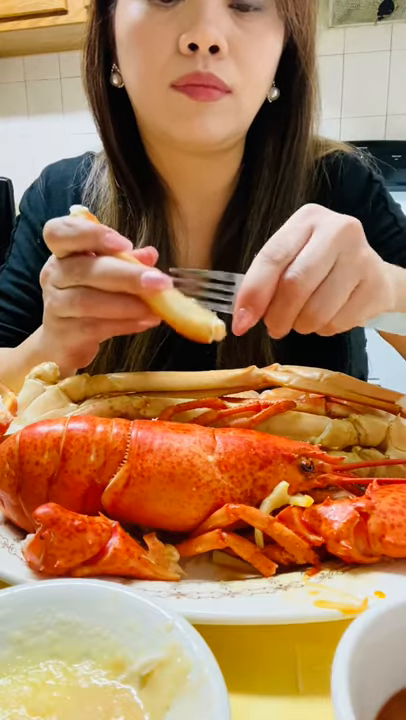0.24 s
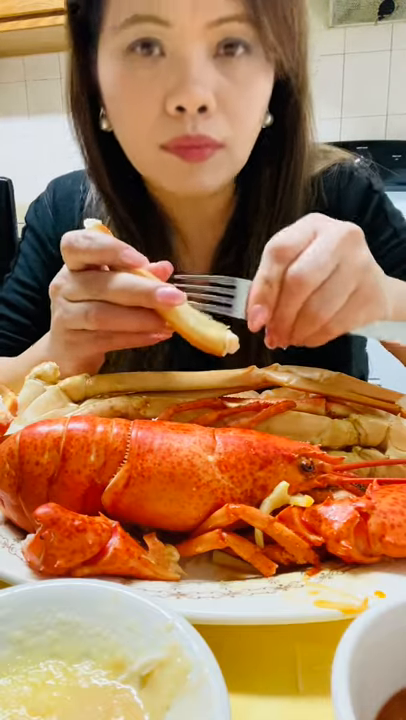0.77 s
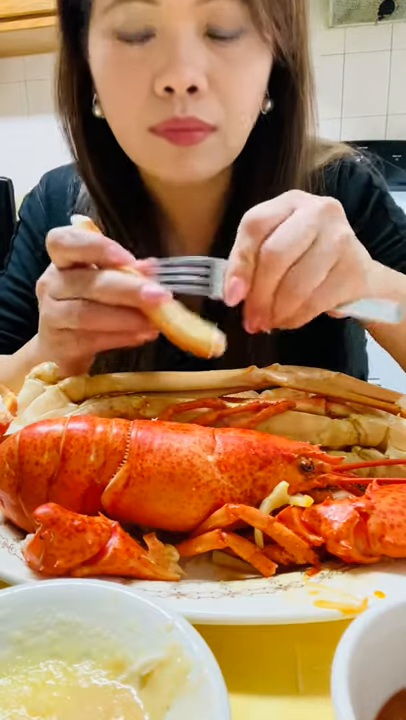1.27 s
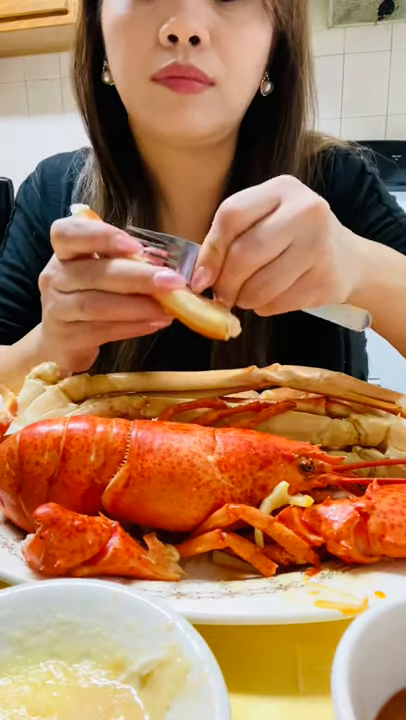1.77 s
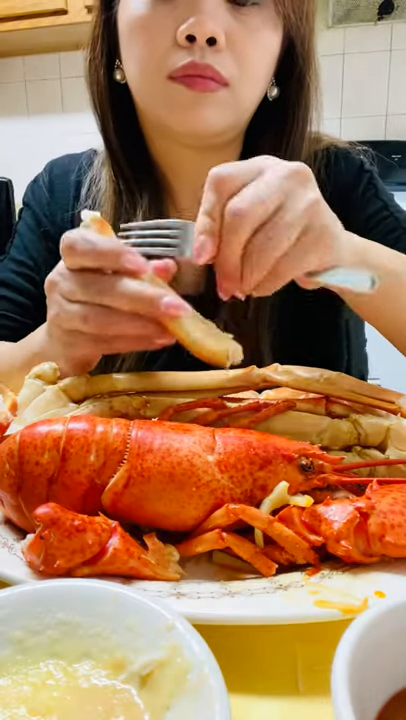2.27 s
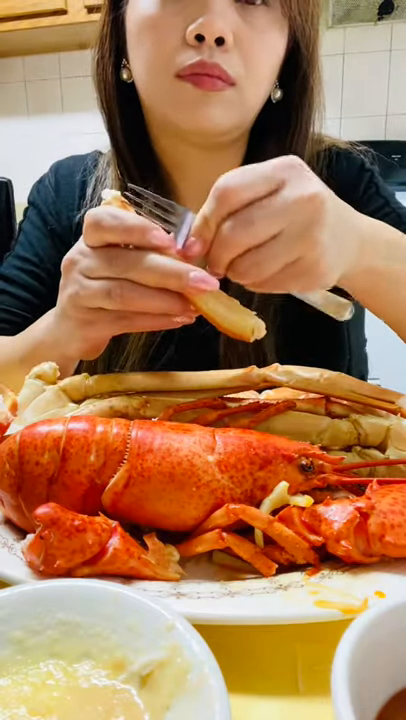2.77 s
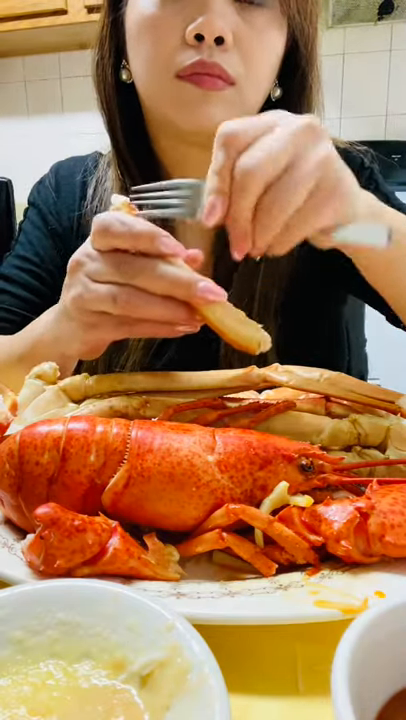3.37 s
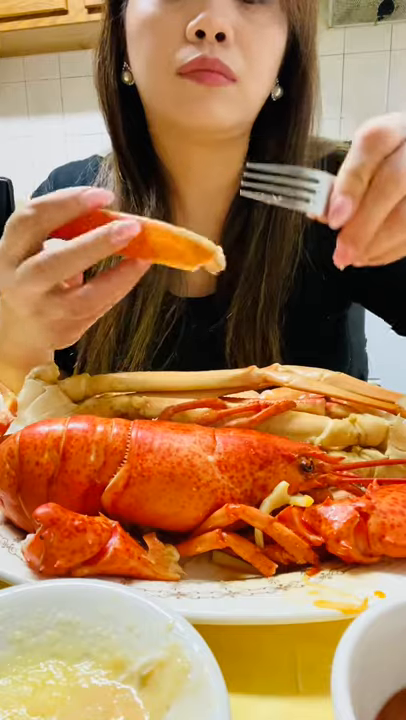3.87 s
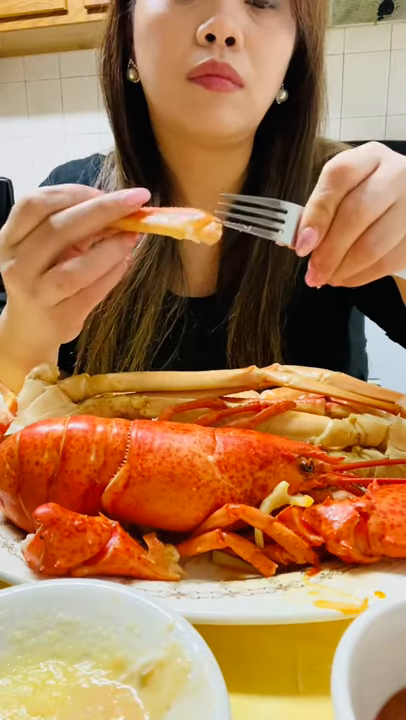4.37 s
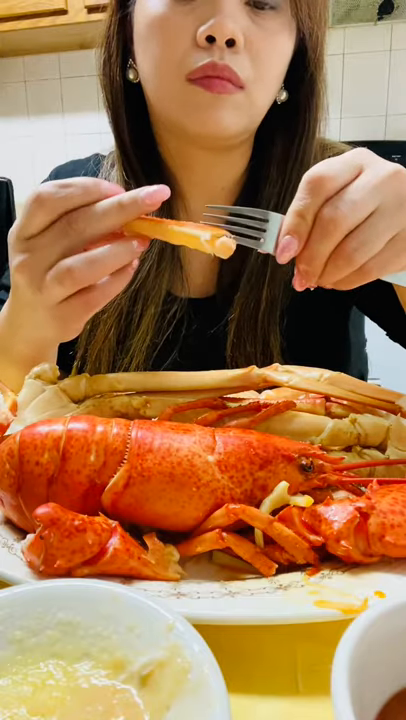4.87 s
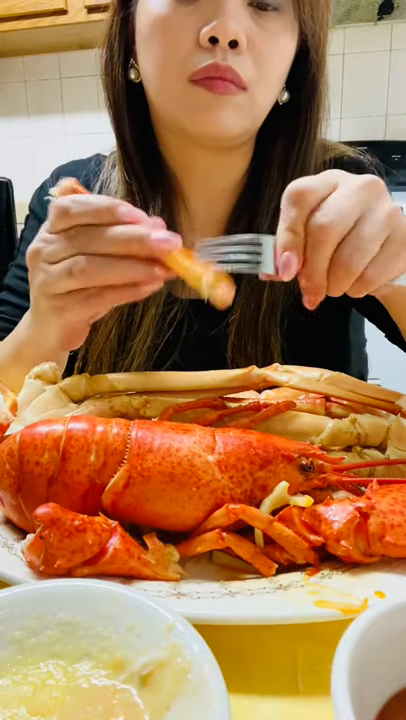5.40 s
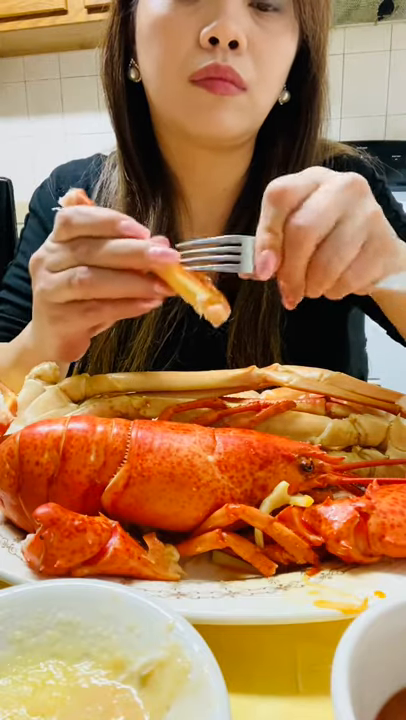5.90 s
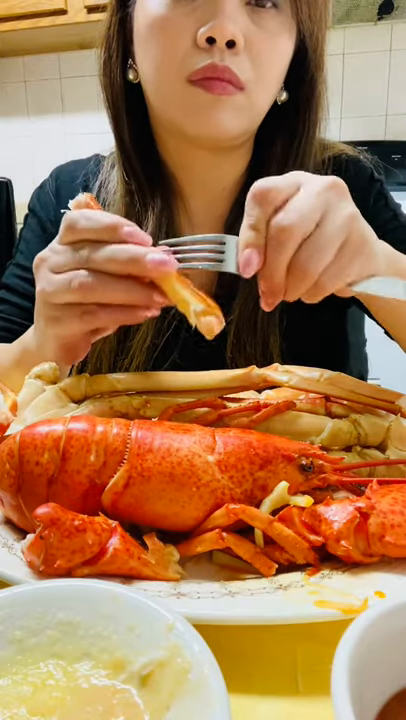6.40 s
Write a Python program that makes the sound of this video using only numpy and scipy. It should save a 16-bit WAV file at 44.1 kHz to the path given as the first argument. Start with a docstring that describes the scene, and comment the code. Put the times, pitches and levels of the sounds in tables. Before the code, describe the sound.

Close stereo microphones in a small kitchen pick up crisp shell snapping, each crunch a clump of tiny rough cracks with a bright spit. Busy at first, it fades to small ticks and a pause with only faint throbbing hum and airy hiss, then the hardest cracks arrive with dull hollow knocks, finishing in a sustained cluster of snaps.

```python
"""A small tiled kitchen: brittle crab shell is crushed again and again, close to a pair of microphone ports.
Each crunch is a clump of snaps, rough noise bursts ringing in the shell's modes, over fine crackle.
Dull knocks are short decaying sines, and sparse echoes follow from the room.
Softly below, narrow noise bands hum, a low rumble throbs, and shaped noise makes room tone and hiss."""
import sys
import numpy as np
from scipy import signal
from scipy.fft import rfft, irfft, next_fast_len
from scipy.io import wavfile
from scipy.ndimage import uniform_filter1d

SR = 44100
rng = np.random.default_rng(int(sys.argv[2]) if len(sys.argv) > 2 else 0)


def store_wav(level_fs):
    """Save 16-bit WAV to argv[1]."""
    pcm = np.round(np.clip(np.atleast_2d(level_fs), -1, 1) * 32767)
    wavfile.write(sys.argv[1], SR, pcm.T.astype(np.int16))


N = 293265

# The clearest snaps of the shell. Each row: time in seconds, ring peak in dB, ring pitch in Hz,
# treble spit in dB over that peak.
SNAPS = [(0.046, -62.5, 2870, 19.5), (0.1221, -42, 2670, 0.5), (0.1593, -42.5, 2810, 3),
         (0.1872, -40, 2620, 9), (0.1977, -14.5, 2580, -9.5), (0.2143, -20, 2700, -7),
         (0.2302, -31, 2840, 0.5), (0.662, -45.5, 2250, 7.5), (0.671, -40, 2220, 7),
         (0.683, -22.5, 2290, -4.5), (0.698, -26.5, 2260, -1.5), (0.7038, -28.5, 3420, -13),
         (0.709, -31.5, 2570, 1), (0.7217, -35, 2160, -6), (0.7644, -39, 2360, -4),
         (0.8034, -40.5, 2880, 3.5), (0.833, -38, 2460, 2), (1.0203, -32.5, 1880, -5),
         (1.0417, -20.5, 2530, -5), (1.0485, -21, 1850, -3.5), (1.0662, -30.5, 2370, 3),
         (1.0712, -34, 2330, 1), (1.0856, -27.5, 2120, -9), (1.205, -34, 2670, -8), (1.2481, -33, 2290, -6),
         (1.322, -46, 3400, 3.5), (1.3352, -48, 2740, 0), (1.3977, -42, 2110, -4),
         (1.4135, -26.5, 2600, -3.5), (1.4248, -27.5, 2070, -1.5), (1.4343, -29.5, 2050, 5),
         (1.4473, -23, 1930, -4), (1.4682, -39.5, 2310, 9.5), (1.6012, -38.5, 2280, -13),
         (1.713, -28, 2160, -2.5), (1.7438, -36, 2680, 5), (1.752, -27.5, 2570, 2.5),
         (1.7569, -29, 2240, 10), (1.7707, -40, 2550, -11), (1.7891, -34.5, 2080, 9),
         (1.9461, -35.5, 2150, -7), (2.0507, -42.5, 2510, 0), (2.064, -47, 2800, 8),
         (2.076, -30.5, 2630, 1), (2.092, -29.5, 2870, 4), (2.1134, -30, 3050, 3), (2.225, -35, 2200, -8),
         (2.2527, -48, 2330, -4), (2.411, -31, 2500, -3.5), (2.433, -37.5, 2450, 9),
         (2.4546, -40, 2050, 7.5), (2.5925, -46, 1680, -1.5), (2.6112, -53, 2420, 7),
         (2.759, -50.5, 2200, 3), (2.776, -45.5, 2250, 2), (2.791, -51, 2640, 8),
         (2.8083, -39.5, 2320, 0.5), (2.8267, -49, 2680, 15.5), (2.866, -48, 2470, 7),
         (2.8916, -40.5, 2100, 5.5), (3.024, -73, 1430, 8), (3.0735, -59, 2270, 3),
         (3.1176, -37.5, 2850, 3.5), (3.2546, -45, 3350, 6.5), (3.352, -43, 2460, -7),
         (3.376, -30, 2140, -7), (3.567, -34.5, 2120, -22.5), (3.5894, -33, 2130, -29),
         (3.7947, -48, 2025, 10.5), (3.826, -44.5, 2083, -31.5), (5.1855, -32, 2205, 0),
         (5.208, -51, 2390, 6), (5.2358, -41, 2600, -5), (5.3046, -23, 2600, -7),
         (5.308, -11.5, 2350, -10.5), (5.3228, -27.5, 2380, 6.5), (5.315, -21, 2180, -6.5),
         (5.3298, -30.5, 2180, 8), (5.35, -41.5, 2320, 11.5), (5.472, -43, 2160, -13.5),
         (5.481, -40.5, 2280, -14), (5.5245, -38.5, 2050, -11), (5.721, -37.5, 2160, 1),
         (5.741, -13.5, 2250, -3), (5.7447, -16.5, 2120, -1), (5.765, -26, 2700, -13),
         (5.7735, -29, 2430, 4), (5.781, -29, 2670, 1), (5.7955, -41, 2570, 3.5), (5.8104, -36, 2770, 6),
         (6.162, -55.5, 2310, -5), (6.187, -27.5, 2570, -5), (6.2231, -25.5, 2480, -1.5),
         (6.2275, -18, 2620, -7), (6.2342, -19, 2660, -9.5), (6.255, -34, 2680, 8),
         (6.3672, -43, 2630, -27), (6.4055, -32.5, 2520, -8), (6.48, -54.5, 2650, 13.5),
         (6.5379, -17, 2306, -4.5), (6.5475, -37, 2210, 5), (6.5568, -38, 2530, 2),
         (6.5635, -29, 2460, -14), (6.5767, -29, 2720, -4), (6.59, -18, 2666, -2.5),
         (6.6014, -24.5, 2740, -2), (6.6117, -33, 2510, -9), (6.634, -28, 2303, 5)]
# How widely a break rings around its pitch, flat chips broad and the whole tube narrow.
# Each row: time in seconds, width as a share of the pitch.
SPREAD = [(0, 0.28), (3.3, 0.5), (3.5, 0.14), (5.3, 0.16), (6.65, 0.023)]


def amp(db):
    """Decibels to gain."""
    return 10 ** (np.asarray(db) / 20)


def evened(x):
    """Scales to rms 1."""
    return x / np.sqrt(np.mean(x ** 2) + 1e-20)


def top(rows):
    """Height of the loudest millisecond of each row, as the peak of a sine of equal power."""
    power = uniform_filter1d(rows ** 2, size=44)
    return np.sqrt(2 * power.max(axis=1, keepdims=True))


def read(points, hz):
    """Reads a table on a log-frequency axis."""
    f, value = np.transpose(points)
    return np.interp(np.log(hz + 1), np.log(f + 1), value)


def over_time(points, t):
    """Reads a table of (seconds, value) at the times t."""
    return np.interp(t, *np.transpose(points))


def coloured(x, points):
    """Filters without delay by a (Hz, dB) table."""
    size = next_fast_len(x.shape[-1])
    gain = amp(read(points, np.fft.rfftfreq(size, 1 / SR)))
    return irfft(rfft(x, size) * gain, size)[..., :x.shape[-1]]


def resonate(x, hz, width):
    """A fixed one-pole resonance of gain 1: the narrower it is, the longer it rings."""
    r = np.exp(-np.pi * width / SR)
    return 2 * signal.lfilter([1 - r], [1, -r * np.exp(2j * np.pi * hz / SR)], x).real


def resonate_each(rows, hz, width):
    """One broad resonance for each row, each with its own centre."""
    return np.array([resonate(x, f[0], w[0]) for x, f, w in zip(rows, hz, width)])


def glide(x, hz, width):
    """A resonance that follows the curve hz: shift down to zero, smooth, shift back."""
    turn = np.exp(2j * np.pi * np.cumsum(hz) / SR)
    r = np.exp(-np.pi * width / SR)
    smooth = signal.lfilter([1 - r], [1, -r], x / turn)
    return 2 * (turn * smooth).real


def room_tone(colour, level_db, patchy_db):
    """Steady noise, its likeness at the two ports set band by band, with faint drifting patches."""
    # Likeness of the two ports. Each row: frequency in Hz, likeness from 0 to 1.
    alike = [(60, 1), (200, 0.98), (700, 0.81), (1200, 0.1), (2200, 0.29), (4000, 0.65), (5500, 1),
             (8000, 0.35), (10500, 0.29), (13500, .2)]
    frames, hz = N // 512 + 5, np.fft.rfftfreq(2048, 1 / SR)
    a, b, c, d, patches = rng.standard_normal((frames, 1025, 5)).T
    patches = uniform_filter1d(uniform_filter1d(patches, 10, 0), 8, 1)
    same = np.clip(read(alike, hz), 0, 1)[:, None]
    left = a + 1j * b
    right = same * left + np.sqrt(1 - same ** 2) * (c + 1j * d)
    gain = amp(read(colour, hz)[:, None] + patchy_db * evened(patches))
    noise = signal.istft(np.array([left, right]) * gain, nperseg=2048, noverlap=1536)[1]
    return amp(level_db) * evened(noise[:, :N])


def machine():
    """Narrow bands of noise waver as hum; a low rumble throbs in a steady beat."""
    # Wavering machine tones. Each row: pitch in Hz, width of each of two passes in Hz, level in dB.
    tones = [(120.6, 3.2, -60), (154.4, 12, -65.5), (237.1, 7.3, -71.5), (785.7, 29, -62)]
    # Colour of the rumble. Each row: frequency in Hz, relative level in dB.
    rumble_colour = [(20, -11.5), (44, -8.5), (58, 6), (77, 15.5), (92, -23.5), (130, -58.5)]
    # The machine's cycle, in one row: mean level in dB, swing in dB either way, throbs a second,
    # first peak in seconds.
    cycle = (-52, 5, 3, -0.67)
    noise = rng.standard_normal((len(tones) + 1, N))
    hum = 0
    for (hz, width, db), n in zip(tones, noise):
        hum = hum + amp(db) * evened(resonate(resonate(n, hz, width), hz, width))
    rumble = evened(coloured(noise[-1], rumble_colour))
    # partly levelled over 100 ms: it wanders in pitch more than in strength
    rumble = rumble / np.sqrt(uniform_filter1d(rumble ** 2, size=4410) + 0.34)
    mean_db, swing_db, per_s, first_s = cycle
    throb = np.cos(2 * np.pi * per_s * (np.arange(N) / SR - first_s))
    return hum + amp(mean_db + swing_db * throb) * evened(rumble)


def kitchen(x, shared=0.68, build_s=0.0045):
    """Sparse echoes of random sign, partly shared by the ports, build up and die at each band's own speed."""
    # Decay of the tiled room. Each row: frequency in Hz, time to fall by 60 dB in seconds.
    decay = [(500, 0.14), (2000, 0.19), (5000, 0.19), (10000, 0.16), (14000, 0.11)]
    taps = np.zeros((2, SR // 2))
    # one echo at a random place in every 20 samples
    at = np.arange(60, SR // 2 - 20, 20) + rng.integers(0, 20, (2, (SR // 2 - 61) // 20))
    np.put_along_axis(taps, at, rng.choice([-1., 1.], at.shape), 1)
    shared = np.clip(shared, 0, 1)
    taps[1] = shared * taps[0] + np.sqrt(1 - shared ** 2) * taps[1]
    hz, t, z = signal.stft(taps, SR, nperseg=128)
    fall = amp(-60 * t / read(decay, hz)[:, None])
    tail = signal.istft(z * fall, SR, nperseg=128)[1]
    # the echoes gather only after the snap itself has passed
    tail = tail * (1 - np.exp(-np.arange(tail.shape[1]) / SR / build_s)) ** 2
    return signal.fftconvolve(x[None], tail / np.linalg.norm(tail[0]), axes=1)[:, :N]


def knocks(rise_turns=0.68, ring_turns=1.6):
    """A few low cycles as the whole leg gives way: sines that swell and die within a few turns."""
    # Dull knocks under the hardest cracks. Each row: start in seconds, level in dB, pitch in Hz.
    thuds = [(.197, -38, 1560), (3.374, -44, 777), (5.307, -44.5, 614), (5.308, -18.5, 1454),
             (5.741, -32, 598), (5.74, -29.5, 1310), (6.223, -35, 585), (6.538, -37.5, 1310),
             (6.589, -37, 1250)]
    out = np.zeros(N + 2048)
    for s, db, hz in thuds:
        turns = hz * np.arange(2048) / SR
        swell = (1 - np.exp(-turns / rise_turns)) * np.exp(-turns / ring_turns)
        out[round(s * SR):][:2048] += amp(db) * swell / swell.max() * np.sin(2 * np.pi * turns)
    return out[:N]


def shell(x):
    """The modes of the hollow shell ring side by side, with alternating sign."""
    # What the shell rings with. Each row: pitch in Hz, width in Hz, level in dB.
    modes = [(1440, 890, -6.5), (1648, 192, 3.5), (2064, 140, 3.5), (2485, 880, -2.5), (2930, 450, 1.5),
             (4670, 1900, -6.5)]
    return sum((-1) ** k * amp(db) * resonate(x, hz, width) for k, (hz, width, db) in enumerate(modes))


def bite(t, hold_s, level_db, swell_s=0.0042, let_go_db_per_s=302.5):
    """The crackle's level swells, holds for the bite, then falls steadily in dB."""
    fall_db = let_go_db_per_s * np.maximum(t - hold_s, 0)
    return np.clip(t / swell_s, 0, 1) * amp(level_db - fall_db)


def strain(t, level_db, below_db=-26.5, rise_db_per_s=900):
    """The loaded shell creaks in a steep swell that leads into a hard snap and stops there."""
    return (t < 0) * amp(level_db + below_db + rise_db_per_s * np.minimum(t, 0))


def crackle(per_s=700, spread_db=3.0, spit_db=-3, tube_width_hz=350, hard_db=-21):
    """Many tiny breaks of uneven size fill each bite, in that bite's pitch and brightness."""
    # Bites of the fork into the shell. Each row: start in seconds, length in seconds, crackle level in dB,
    # ring pitch in Hz, treble spit in dB (spit_db is added to it).
    crunches = [(0.0, 0.032, -56, 2500, -6), (0.11, .05, -65.5, 2800, -6), (0.182, 0.038, -37.5, 2700, -1),
                (.29, 0.042, -57.5, 2700, -2.5), (0.655, 0.077, -45.5, 2400, -9),
                (.76, 0.07, -62, 2500, -21), (0.872, 0.032, -55.5, 2350, -3),
                (1.045, 0.018, -36, 2200, -4.5), (1.193, 0.044, -49, 2350, -5.5),
                (1.396, 0.042, -43, 2200, -2), (1.541, 0.051, -56, 2350, -2.5),
                (1.734, 0.04, -45, 2400, -1), (1.9, 0.038, -54.5, 2400, -6.5),
                (2.048, 0.087, -52, 2750, 3.5), (2.214, 0.07, -61, 2300, -0.5),
                (2.4, 0.065, -49.5, 2500, 3.5), (2.602, 0.025, -58.5, 2000, -2),
                (2.752, 0.13, -59, 2350, 3.5), (3.074, 0.036, -62.5, 2250, 1.5),
                (3.333, 0.042, -58, 2200, -4), (3.562, 0.013, -53, 2080, -18),
                (3.798, 0.029, -64, 2080, -11.5), (5.005, 0.021, -67, 1960, -27),
                (5.175, 0.058, -58.5, 2400, -4), (5.305, 0.03, -34, 2300, -9.5),
                (5.47, 0.078, -62, 2150, -11.5), (5.632, 0.022, -64.5, 2200, -25),
                (5.745, 0.048, -38, 2450, -6), (5.972, 0.017, -59, 2280, -12), (6.151, .05, -63, 2300, -17),
                (6.216, 0.032, -36.5, 2620, -9), (6.361, 0.051, -50, 2480, -20),
                (6.545, 0.17, -43.5, 2550, -6)]
    t = np.arange(N) / SR
    sizes = amp(spread_db * np.minimum(rng.exponential(1, N), 4))
    breaks = sizes * (rng.random(N) < per_s / SR)
    breaks = np.convolve(breaks, np.exp(-np.arange(64) / 10.))[:N] * rng.standard_normal(N)
    start, length, db, pitch_hz, treble_db = np.transpose(crunches)
    latest = np.maximum(np.searchsorted(start, t) - 1, 0)
    chips = evened(shell(breaks))
    tube = evened(glide(chips, pitch_hz[latest], tube_width_hz))
    spit = amp(spit_db + treble_db[latest]) * evened(coloured(breaks, spit_colour()))
    broad = np.clip(2 * over_time(SPREAD, t), 0, 1)  # narrow snaps go with narrow crackle
    grains = broad * chips + (1 - broad) * tube + spit
    bites = sum(bite(t - s, hold_s, level_db) for s, hold_s, level_db in zip(start, length, db))
    # only the snaps above hard_db are led in by a creak
    creak = tube * sum(strain(t - s, level_db) for s, level_db, *_ in SNAPS if level_db > hard_db)
    return creak + grains * bites


def spit_colour():
    """Colour of the treble spit that snaps and crackle share."""
    # Each row: frequency in Hz, relative level in dB.
    return [(2500, -14.5), (3500, -10.5), (4600, 0.5), (6200, 7.5), (7000, 5.5), (8300, 0), (11500, -0.5),
            (13500, -3), (15300, 4), (16400, -16)]


def snaps(rise_s=0.0013, break_s=0.001, spit_s=0.0027, needle_db=8, early_s=0.0018):
    """Each snap: a short rough break rings the shell near its own pitch and spits a burst of treble."""
    s, db, pitch_hz, treble_db = np.transpose(SNAPS)[:, :, None]
    t = np.arange(512) / SR
    rough, fizz = rng.standard_normal((len(SNAPS), 512, 2)).transpose(2, 0, 1)
    width = pitch_hz * over_time(SPREAD, s)
    force = rough * (1 - np.exp(-t / rise_s)) ** 2 * np.exp(-t / break_s)
    ring = shell(resonate_each(force, pitch_hz, width))
    after = np.maximum(t - early_s + 0.00055, 0)  # the spit sets in 0.55 ms ahead of the snap's time
    needle = amp(needle_db) * np.exp(-after / .00015)  # the first instant of the break is the sharpest
    spit = coloured(fizz * (after > 0) * (needle + np.exp(-after / spit_s)), spit_colour())
    sound = amp(db) * ring / top(ring) + amp(db + treble_db) * spit / top(spit)
    first = np.round((s - early_s) * SR).astype(int)  # the break starts before its peak
    out = np.zeros(N + 512)
    np.add.at(out, first + np.arange(512), sound)
    return out[:N]


def turned(x):
    """Raises or lowers the top treble of the breaks, as the shell turns to and from the ports."""
    # Level of the top treble. Each row: time in seconds, gain in dB.
    sheen = [(0, -1.5), (1.3, -1), (1.75, -2.5), (2.3, -0.5), (3.098, 10.5), (3.801, -3), (5.2, -3.5),
             (5.75, -9), (6.3, -1.5), (6.65, 0.5)]
    # The band it acts on. Each row: frequency in Hz, level in dB.
    sheen_band = [(8000, -40), (11000, 0), (16000, 0)]
    gain = amp(over_time(sheen, np.arange(N) / SR))
    return x + (gain - 1) * coloured(x, sheen_band)


def scene():
    """Shell up close with its echoes, over machine, room tone and hiss."""
    # Air moved by the machine. Each row: frequency in Hz, relative level in dB per Hz.
    air_colour = [(53, -46), (90, -9.5), (161, -9), (189, -21), (226, -13), (368, -19.5), (526, -16.5),
                  (618, -20.5), (796, -13), (850, -28), (1100, -50), (1870, -120)]
    # Faint hiss above it. Each row: frequency in Hz, relative level in dB per Hz.
    hiss_colour = [(520, -25.5), (880, -8.5), (1510, -12), (1610, -15.5), (2050, -16), (2700, -26),
                   (13000, -44), (14500, -67)]
    # The echoes favour one band. Each row: frequency in Hz, gain in dB.
    echo_colour = [(900, 3), (1700, -3.5), (2150, 1), (2700, -2), (4500, -4), (9000, -4), (13500, -0.5),
                   (14800, -13), (16000, -26.5)]
    air = room_tone(air_colour, level_db=-54.5, patchy_db=1.4)
    hiss = room_tone(hiss_colour, level_db=-69.5, patchy_db=0.0)
    crab = turned(snaps() + crackle()) + knocks()
    echoes = amp(-7) * kitchen(coloured(crab, echo_colour))
    return air + hiss + machine() + echoes + crab


def record(dry, port_gap_m=0.033, sound_m_per_s=343, edge_hz=16600):
    """The port pair: the right trails the left by the gap and is tilted against it; then the band limit."""
    # Tilt of the pair. Each row: frequency in Hz, left over right in dB.
    tilt = [(60, 0.0), (110, -0.5), (200, -1.5), (380, -2.0), (700, -1.0), (1290, -3.5), (2380, -1.0),
            (4400, 0.0), (8120, 0.0), (15000, -0.5)]
    # How much the housing shortens the lag. Each row: frequency in Hz, phase in radians.
    shadow = [(1400, 0), (2800, .35), (3400, 1.25), (4100, 1.2), (4800, -.3), (6000, 0)]
    size = next_fast_len(N + 512)
    hz = np.fft.rfftfreq(size, 1 / SR)
    lag = 2 * np.pi * hz * port_gap_m / sound_m_per_s - read(shadow, hz)
    half = amp(read(tilt, hz) / 2) * np.exp(.5j * lag)  # half of the difference goes to each port
    ports = irfft(rfft(dry, size) * [half, 1 / half], size)[:, :N]
    low_pass = signal.firwin(511, edge_hz, window=("kaiser", 9), fs=SR)
    return signal.oaconvolve(ports, low_pass[None], "same")


dry = scene()
out = record(dry)
store_wav(out)
```